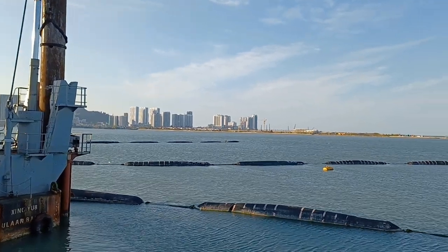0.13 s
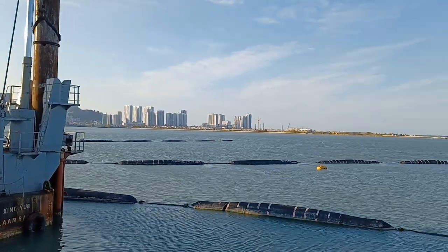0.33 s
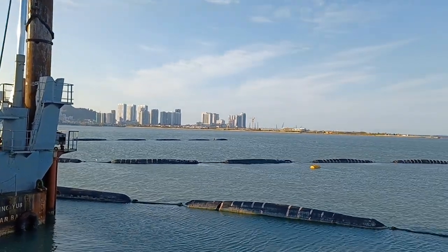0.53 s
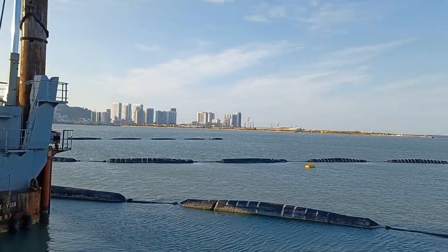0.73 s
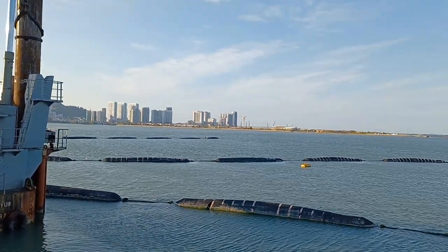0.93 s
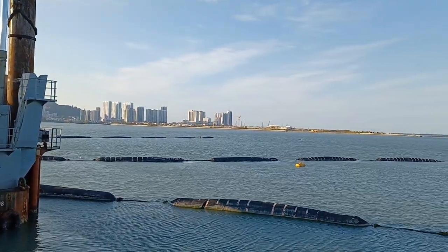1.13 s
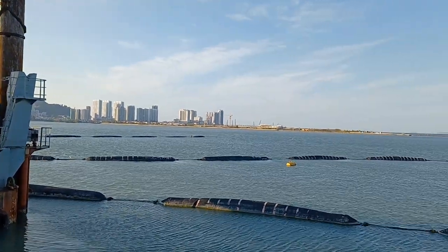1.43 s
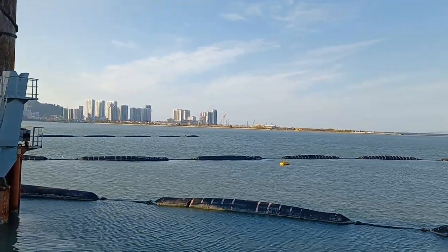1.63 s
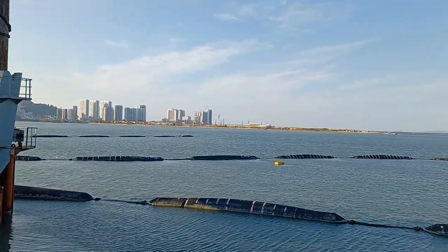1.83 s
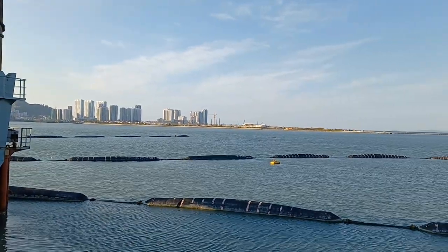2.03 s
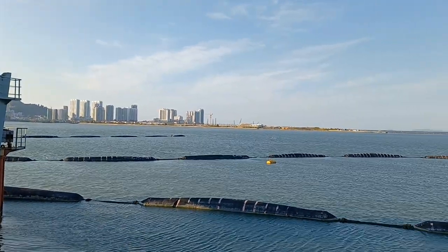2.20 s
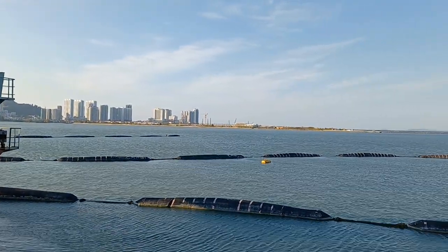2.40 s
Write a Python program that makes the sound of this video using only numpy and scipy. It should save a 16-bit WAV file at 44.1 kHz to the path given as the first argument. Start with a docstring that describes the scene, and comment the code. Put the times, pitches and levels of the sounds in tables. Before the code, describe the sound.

Diesel machinery on a work vessel drones from the left, with a throbbing exhaust rumble, a fan hum and rushing air. The hiss gradually dims while a light breeze ruffles the microphone.

```python
"""On a work vessel in calm water, the diesel machinery drones. A six-cylinder main engine and a
slower generator beat against each other while a fan hums. The exhaust rumbles and throbs, the
engine casing roars, and air and clatter rush from the engine room. The sound dims as the
microphone turns away, and a light breeze ruffles its ports (the openings that let sound in)."""
import sys
import numpy as np
from scipy import signal
from scipy.fft import rfft, irfft, next_fast_len
from scipy.io import wavfile
from scipy.ndimage import uniform_filter1d, map_coordinates

SR = 44100
rng = np.random.default_rng(int(sys.argv[2]) if len(sys.argv) > 2 else 0)


def put_to_file(sound):
    """Save the sound as 16-bit audio at rate SR, in the file named by the first command-line argument."""
    columns = np.atleast_2d(sound).T  # one column per channel
    safe = np.clip(columns, -1, 1)
    whole_steps = np.round(safe * 32767)
    wavfile.write(sys.argv[1], SR, whole_steps.astype(np.int16))


N = 112896

ENGINE_CYCLE_HZ, GENERATOR_CYCLE_HZ, FAN_HZ = 14.131, 12.377, 160.0
CYLINDERS = 6
IN_STEP_S = 0.379  # a moment when engine and generator fire together

# The tones of each machine. Each row: multiple of its cycle rate, relative level in dB.
ENGINE_TONES = [(5, -46), (6, -37.5), (12, -49), (15, -43.5), (16, -45), (17, -51.5)]
GENERATOR_TONES = [(6, -41.5), (12, -44.5), (31, -61.5)]
FAN_TONES = [(1, -40), (2, -50.5)]
WHIR_TONES = [(26, -61), (32, -53), (34, -53), (36, -67), (39, -63), (46, -53.5), (60, -61.5), (65, -55),
              (66, -81), (119, -54)]

# The tone colour of each noise. Each row: frequency in Hz, relative strength there in dB.
RUMBLE_COLOUR = [(20, -35), (40, -28), (55, -11), (66, -7), (82, 2.5), (120, 0), (160, -8.5), (190, -5),
                 (225, 1), (270, -5), (300, -9), (325, 0.5), (355, -12), (420, -15), (600, -32),
                 (3000, -120)]
ROAR_COLOUR = [(100, -20), (250, -8.5), (390, 2), (480, 0.5), (620, -4.5), (760, -9), (1000, -14),
               (1300, -30), (3000, -96)]
AIR_COLOUR = [(200, -31), (450, -7.5), (700, -1.5), (950, 4), (1100, 1.5), (1300, -3.5), (1500, -2),
              (1680, -0.5), (1850, -5), (2100, -4), (2700, -9), (3300, -14), (3850, -13), (4600, -17),
              (5150, -17), (6000, -21.5), (6800, -23), (9000, -26), (12500, -26.5), (15500, -32)]
BREEZE_COLOUR = [(20, -11), (45, -10.5), (75, -5.5), (130, 2), (220, 0), (400, -17.5), (700, -23.5),
                 (1500, -69), (4000, -120)]
THROB_COLOUR = [(40, -31), (100, -10.5), (150, 1.5), (185, -0.5), (230, 4.5), (280, -5), (330, -8.5),
                (400, -14), (600, -28), (1000, -46), (3000, -120)]
THUMP_COLOUR = [(25, -34), (52, -11.5), (80, 15.5), (120, 7), (250, -17), (400, -15), (900, -54),
                (3000, -120)]

# How alike a noise is on the left and right. Each row: frequency in Hz, likeness (1 is identical).
EXHAUST_LIKENESS = [(60, 1), (250, 0.94), (600, 1)]
ROAR_LIKENESS = [(400, 0.7), (900, 1)]
AIR_LIKENESS = [(400, 1), (900, 0.67), (1600, 0.42), (2200, 0.046), (2850, 0.14), (5500, 0.075),
                (9000, 0.17), (14000, 0.06)]

# How the bass, air and breeze rise and fall. Each row: time in seconds, relative level in dB.
BASS_LOUDNESS = [(0, 0.5), (.2, 1), (.3, -2), (.42, 1), (.55, -1), (.76, 2), (.87, -1), (.97, 1.5),
                 (1.22, 2.5), (1.33, -3), (1.46, -1), (1.64, -4), (1.8, -1), (1.91, -10), (1.97, -10),
                 (2.12, -10.5), (2.2, -2), (2.38, -3.5), (2.56, -8)]
AIR_LOUDNESS = [(0, -47.5), (.3, -47.5), (.5, -49), (.95, -49.5), (1.3, -50), (1.75, -51.5), (1.98, -54),
                (2.2, -53.5), (2.56, -55.2)]
BREEZE_LOUDNESS = [(0, -53), (.2, -41), (.28, -30.5), (.4, -32), (.48, -33), (.6, -35.5), (.8, -42),
                   (1.15, -46), (1.3, -36.5), (1.48, -35), (1.54, -34), (1.6, -34), (1.7, -40.5),
                   (1.85, -33.5), (2.0, -36), (2.07, -35.5), (2.2, -37.5), (2.35, -41)]

# The exhaust's throbs and deeper thumps. Each row: time of the peak in seconds, level in dB.
EXHAUST_THROBS = [(.02, -27.5), (.058, -23.5), (.106, -24), (.178, -29), (.204, -31.5), (.243, -26),
                  (.295, -27), (.385, -27), (.404, -26), (.49, -33), (.622, -27.5), (.705, -29.5),
                  (.74, -25.5), (.775, -32), (.82, -30), (.915, -27.5), (.96, -32), (1.005, -30.5),
                  (1.03, -27.5), (1.08, -38), (1.165, -30.5), (1.247, -27), (1.317, -27), (1.405, -30),
                  (1.445, -28.5), (1.472, -33.5), (1.525, -30.5), (1.59, -35), (1.667, -28.5), (1.747, -30),
                  (1.785, -34.5), (1.85, -36), (1.9, -31.5), (1.925, -31), (2.04, -33.5), (2.19, -34.5),
                  (2.25, -32), (2.3, -31.5), (2.37, -37), (2.45, -31.5), (2.52, -32.5)]
EXHAUST_THUMPS = [(0.109, -31), (0.186, -27.5), (0.38, -26.5), (0.768, -27), (0.955, -26), (1.536, -32.5),
                  (1.72, -36), (2.375, -37)]

# How much sooner the machinery reaches the left port. Each row: frequency in Hz, lead in seconds.
LEFT_HEAD_START = [(600, .00016), (800, .00023), (1100, .00028), (1550, .00034), (2200, .00045),
                   (2850, .00052), (5400, .000555)]


def amp(db):
    """Turn decibels into a number to multiply by."""
    return 10 ** (np.asarray(db) / 20)


def along(rows, hz):
    """Read between (Hz, value) rows on a logarithmic frequency scale."""
    row_hz, values = np.transpose(rows)
    return np.interp(np.log(hz + 1), np.log(row_hz + 1), values)


def clock():
    """The time of each sample in seconds."""
    return np.arange(N) / SR


def curve(rows):
    """Join (seconds, value) rows with straight lines."""
    return np.interp(clock(), *np.transpose(rows))


def wobble(rate):
    """A smooth curve through `rate` random values a second."""
    return map_coordinates(rng.standard_normal(256), [clock() * rate + 2], mode="wrap")


def filtered(sound, response):
    """Scale and shift each frequency of a sound by response(hz)."""
    size = next_fast_len(N + 8192)
    hz = np.fft.rfftfreq(size, 1 / SR)
    return irfft(rfft(sound, size) * response(hz), size)[..., :N]


def unit(sound):
    """Scale a signal to an average power of 1."""
    return sound / np.sqrt(np.mean(sound ** 2) + 1e-20)


def noise(colour, likeness=None):
    """Coloured stereo noise; left and right are unrelated unless a likeness is given."""
    def response(hz):
        alike = along(likeness, hz) if likeness else 0 * hz
        spread = np.arccos(np.clip(alike, -1, 1)) / 2
        return amp(along(colour, hz)) * [np.cos(spread), np.sin(spread)]
    mid, side = filtered(rng.standard_normal((2, N)), response)
    return unit(np.array([mid + side, mid - side]))


def steady(sound, smoothing_s=0.015):
    """Even out a stereo noise's own swells, keeping its fine grain."""
    window = signal.windows.hann(int(2 * smoothing_s * SR))
    power = signal.fftconvolve(np.mean(sound ** 2, axis=0), window, "same")
    return unit(sound / np.sqrt(np.abs(power) + 1e-9))


def patchy(sound, depth_db):
    """Make random patches of pitch and time a little louder or softer."""
    spectra = signal.stft(sound, nperseg=512)[2]
    patches = uniform_filter1d(rng.standard_normal(spectra.shape[1:]), size=3, axis=0)
    patches = uniform_filter1d(patches, size=16, axis=1)
    return signal.istft(spectra * amp(depth_db * unit(patches)), nperseg=512)[1][:, :N]


def drone(cycle_hz, tones, phases, waver_db=3.2, waver_rad=0.13):
    """The tones of one steadily turning machine, each wavering a little on its way."""
    sound = np.zeros(N)
    for multiple, db in tones:
        turns = round(multiple) * cycle_hz * (clock() - IN_STEP_S) + phases[round(multiple)]
        strength = np.sqrt(2) * amp(db + waver_db * wobble(5.84))
        sound += strength * np.sin(2 * np.pi * turns + waver_rad * wobble(4.96))
    return sound


def machine_hum():
    """Engine and generator firings beat about ten times a second while the fan hums."""
    phases = rng.random(128)  # shared, so the two diesels line up at IN_STEP_S
    engine = drone(ENGINE_CYCLE_HZ, ENGINE_TONES, phases)
    generator = drone(GENERATOR_CYCLE_HZ, GENERATOR_TONES, phases)
    return engine + generator + drone(FAN_HZ, FAN_TONES, phases)


def exhaust_rumble():
    """The exhaust makes a low noise with slight, quick swells."""
    swells = amp(wobble(29.55))
    return amp(-35) * unit(swells * steady(noise(RUMBLE_COLOUR, EXHAUST_LIKENESS)))


def engine_casing(swell_db=2.05, fade_db_per_s=3.5):
    """The main engine's casing roars and whirs, fading as the microphone turns away."""
    swells = amp(swell_db * wobble(22.46))
    roar = amp(-37.5) * unit(swells * noise(ROAR_COLOUR, ROAR_LIKENESS))
    whir = drone(ENGINE_CYCLE_HZ, WHIR_TONES, rng.random(128))
    return amp(-fade_db_per_s * clock()) * (roar + whir)


def engine_room(boost_db=7, flutter_db=0.5):
    """Rushing air and clatter pulse faintly with the firings and fade as the microphone turns away."""
    cycle_angle = 2 * np.pi * (ENGINE_CYCLE_HZ * clock() + rng.random())
    firings = 0.053 * np.cos(CYLINDERS * cycle_angle)
    uneven_cylinders = 0.041 * np.cos(cycle_angle)
    balance_db = 1.05 * np.array([[-.5], [.5]])  # a little louder on the right
    level_db = curve(AIR_LOUDNESS) + boost_db + flutter_db * wobble(54.9) + balance_db
    air = patchy(noise(AIR_COLOUR, AIR_LIKENESS), depth_db=1.5)
    return amp(level_db) * (1 + firings + uneven_cylinders) * air


def breeze(lump_db=4):
    """Wind hits the microphone in soft, low lumps, different at each port."""
    lumps = amp(lump_db * np.array([wobble(21.8), wobble(22.01)]))
    return amp(curve(BREEZE_LOUDNESS)) * unit(lumps * noise(BREEZE_COLOUR))


def exhaust_puffs(rows, colour, width_s):
    """The exhaust puffs unevenly, in short, soft-edged lumps of noise."""
    power = sum(amp(db) ** 2 * np.exp(-((clock() - peak_s) / width_s) ** 2) for peak_s, db in rows)
    return np.sqrt(power) * steady(noise(colour, EXHAUST_LIKENESS))


def from_left(sound):
    """The machinery lies to the left, so its sound reaches that port first."""
    def shift(hz):
        lead_turns = hz * along(LEFT_HEAD_START, hz)
        return np.exp(1j * np.pi * np.outer([1, -1], lead_turns))  # half the shift on each side
    return filtered(sound, shift)


def scene():
    """Mix the machinery on the left with the breeze on the ports."""
    bass = amp(curve(BASS_LOUDNESS)) * (machine_hum() + exhaust_rumble())
    throbs = exhaust_puffs(EXHAUST_THROBS, THROB_COLOUR, width_s=0.01)
    thumps = exhaust_puffs(EXHAUST_THUMPS, THUMP_COLOUR, width_s=0.018)
    return from_left(bass + throbs + thumps + engine_casing() + engine_room()) + breeze()


def record(dry):
    """Cut away the very highest treble, above 15730 Hz."""
    return filtered(dry, lambda hz: hz < 15730)


dry = scene()
out = record(dry)
put_to_file(out)
```